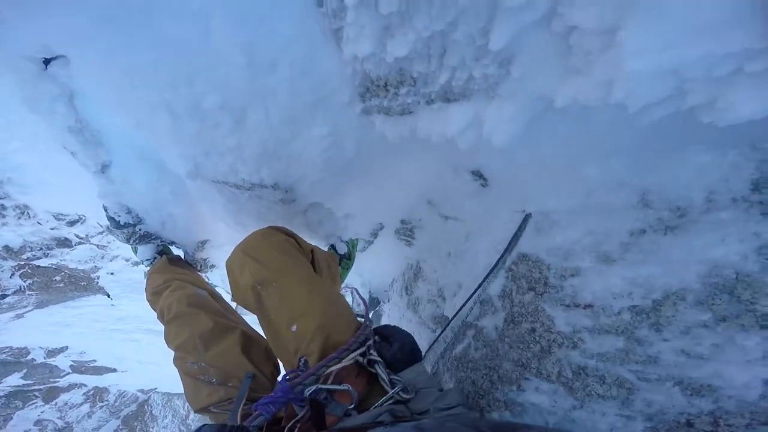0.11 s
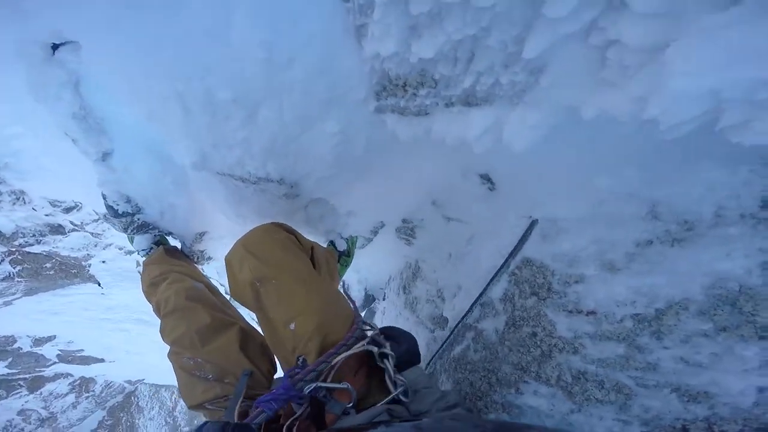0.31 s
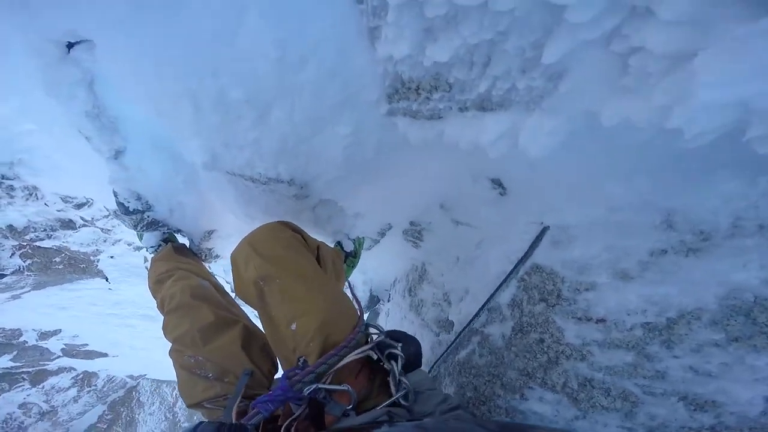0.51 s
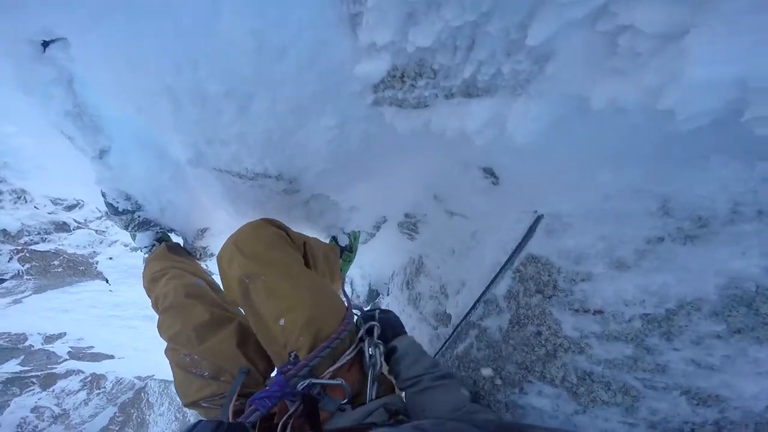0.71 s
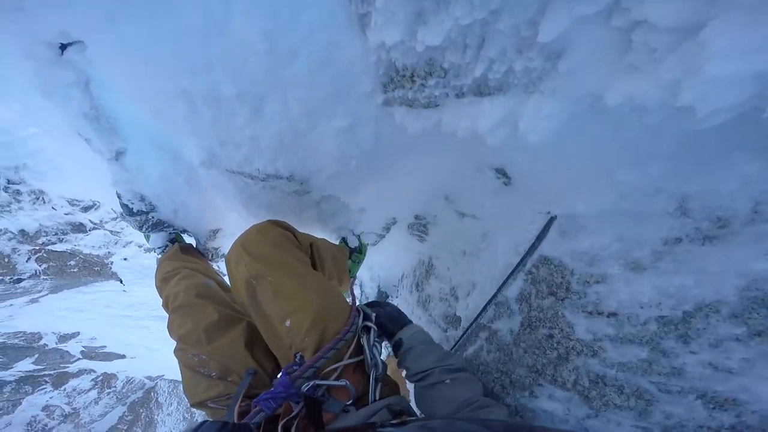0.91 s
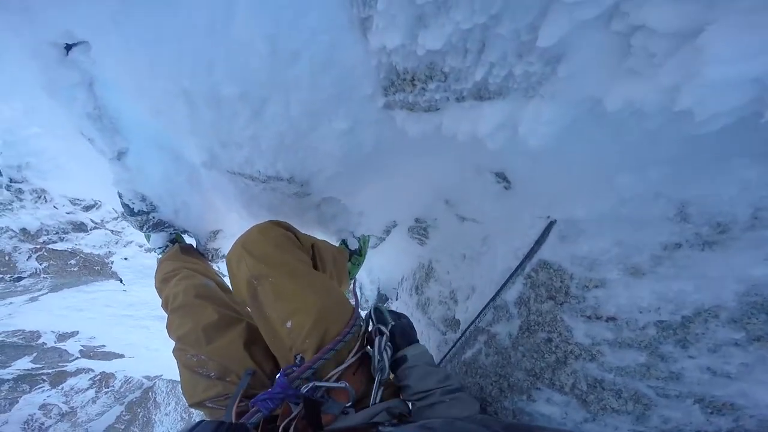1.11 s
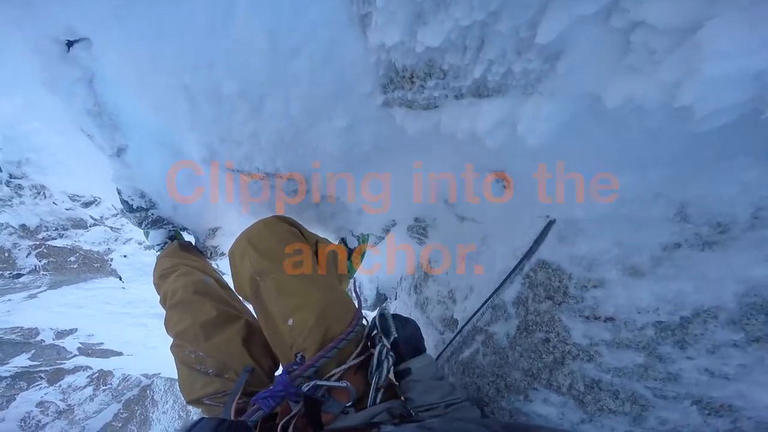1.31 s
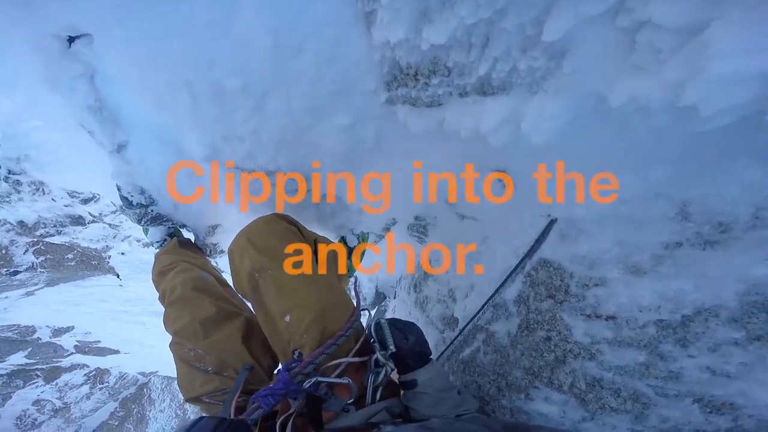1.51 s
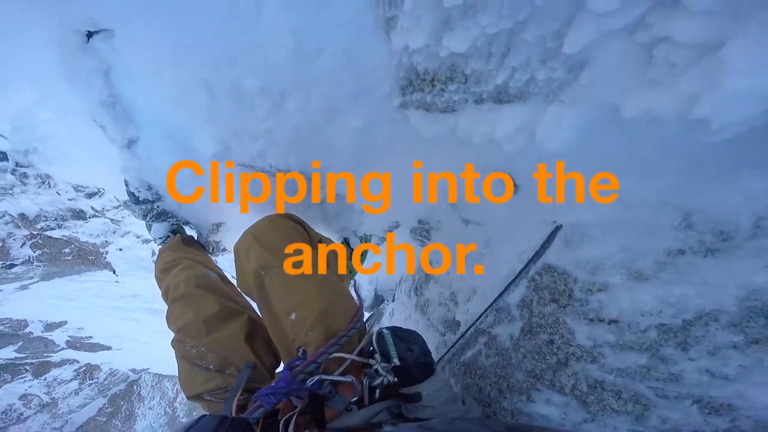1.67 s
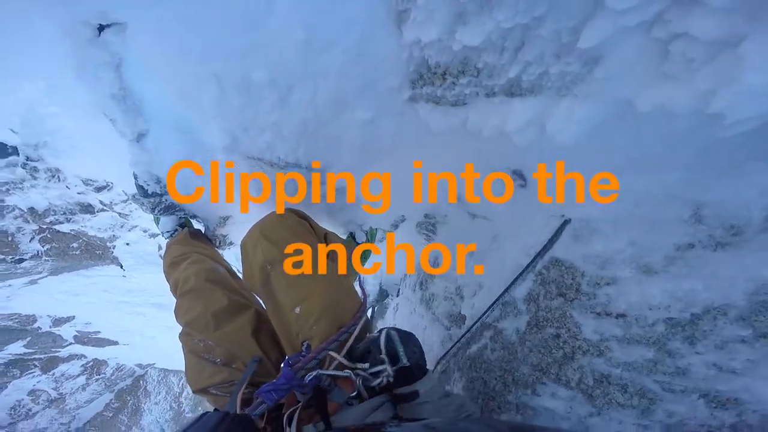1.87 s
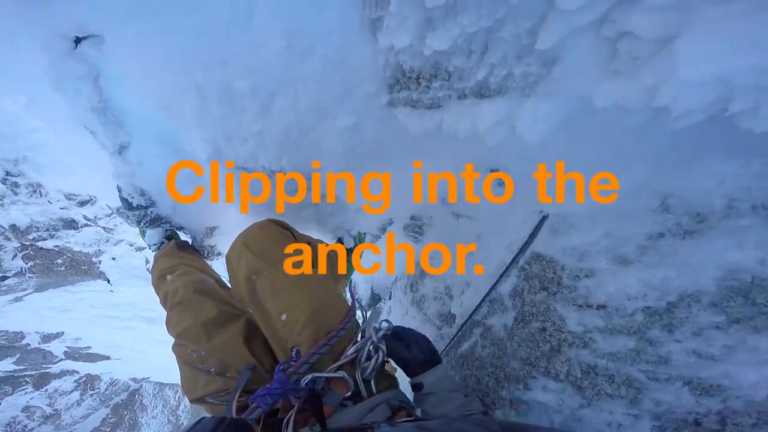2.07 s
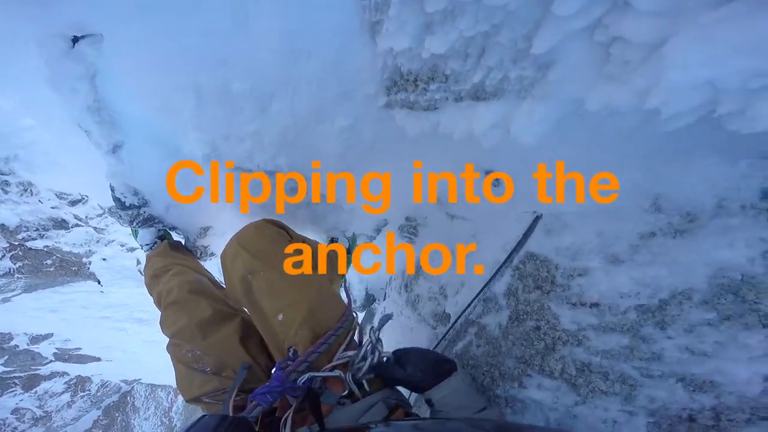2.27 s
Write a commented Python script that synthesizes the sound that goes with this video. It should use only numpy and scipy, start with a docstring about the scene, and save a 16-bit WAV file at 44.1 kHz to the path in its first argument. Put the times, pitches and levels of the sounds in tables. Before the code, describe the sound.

A boot knocks icy rock, then two hard sharp cracks and a thump, with faint snow scraping after

```python
"""First a soft hiss of sliding snow and cloth over a low rumble of air, then a boot knock and two sharp cracks.
A climber shifts stance on an icy rock wall, heard from a small camera worn on the body.
Boots, gear and camera mount ring as fading tones; knocks and ticks are short crunches split into bands.
The second crack thumps the mount and overloads the microphone. Later, ice and gear tick faintly.
Scraping, air and rubbing are shaped noise; the camera adds hiss and a thin whine."""
import sys
import numpy as np
from scipy import signal
from scipy.fft import rfft, irfft
from scipy.io import wavfile
from scipy.ndimage import uniform_filter1d

SR = 44100
rng = np.random.default_rng(int(sys.argv[2]) if len(sys.argv) > 2 else 0)


def int16_out(signal):
    """Quantize to a 16-bit WAV file."""
    q = np.round(np.clip(np.atleast_2d(signal).T, -1, 1) * 32767)
    wavfile.write(sys.argv[1], SR, q.astype(np.int16))


N = 105840  # samples, 2.4 s

# t60_s is always the time a sound takes to fade by 60 dB.
# Hollow body of a boot: pitch_hz, t60_s
BOOT_MODES = [(511, 0.044), (755, 0.047), (968, 0.034), (1260, 0.03), (1640, 0.023), (1950, 0.011),
              (2370, 0.019), (2760, 0.014), (3450, 0.012)]
# Boot against rock: start_s, then level_db of each boot mode, low to high
BOOT_KNOCKS = [ (0.0865, -24.5, -34.5, -19.5, -18.5, -14, -33, -24.5, -15, -23),
               (1.2564, -45, -38, -29.5, -28.5, -29, -28.5, -24, -23, -33),
               (1.9002, -50.5, -54, -42.5, -38.5, -44, -35.5, -46, -35, -50.5)]
BOOT_PUSH_S, BOOT_GRIT_DB, BOOT_GRIT_HZ = 0.0022, 0, 1020  # rise time, grit gain, grit upper limit

# Borders between the six pitch bands of a hard contact: edge_hz
BAND_EDGES_HZ = [330, 750, 1900, 3100, 5500, 8300, 13500]
# Hard knocks: start_s, contact_s, then level_db in each of the six bands, low to high
KNOCKS = [ (0.2201, 0.00042, -49, -27.5, -44, -43, -60, -66),
          (0.2222, 0.0024, -27, -18.5, -12, -18.5, -35.5, -37),
          (0.2578, 0.0028, -28.5, -10, -4.5, -22, -18.5, -29),
          (1.3290, 0.00071, -92, -57, -57.5, -70, -74, -69),
          (1.3853, 0.002, -76.5, -59, -50.5, -45.5, -63, -68),
          (1.4434, 0.0025, -71, -55, -48.5, -65, -70, -69),
          (1.9700, 0.00092, -67, -53.5, -42, -46.5, -44.5, -47),
          (1.9733, 0.0032, -67.5, -51.5, -42.5, -44, -40.5, -45.5)]
# Fading of a knock, one value per band: t60_s
KNOCK_T60_S = [0.017, 0.023, 0.016, 0.0023, 0.0028, 0.002]
# Small ticks of ice and gear: start_s, then level_db in each of the upper five bands
TICKS = [ (0.616, -73.5, -65.5, -69.5, -70, -78), (0.9614, -79, -64, -65, -78.5, -77.5),
         (1.1289, -71, -64, -64.5, -66, -61), (1.4706, -63, -61, -57, -60.5, -62),
         (1.5454, -67, -55.5, -63.5, -64.5, -88), (1.571, -60, -55.5, -60.5, -80.5, -88),
         (1.6830, -63, -58, -63.5, -68.5, -72), (1.746, -72.5, -61.5, -65, -59, -59),
         (1.9838, -60.5, -62, -65.5, -69.5, -61), (2.225, -64, -63, -62, -55, -64.5),
         (2.245, -67, -59, -52.5, -61, -60.5), (2.2945, -86.5, -73, -67, -62, -61),
         (2.3302, -66, -63, -52.5, -64, -68)]
# Fading of a tick, one value per upper band: t60_s
TICK_T60_S = [0.046, 0.015, 0.016, 0.01, 0.0042]
TICK_CONTACT_S = 0.00066
STRIKE_DB = 18  # the first instant of a contact, over the crunch that follows
# Resonances of the camera case, which colour knocks and ticks: pitch_hz, width_hz, level_db
CASE_MODES = [(520, 37, -2.5), (983, 180, 4.5), (1210, 95, 8.5), (1579, 340, 9), (2631, 120, 13),
              (3240, 1800, 8), (5616, 1200, 1), (6804, 200, 1.5), (10500, 890, 1)]

# Ring of the struck gear: pitch_hz, level_db, t60_s (before the extra damping of each blow)
GEAR_MODES = [(266, -8, .22), (897, -21, .11), (1923, -2.5, .175), (2266, -5, .08), (2993, -13, .08),
              (4560, 1, .04), (5830, -6, .033)]
# Blows that set the gear ringing: start_s, level_db, extra_damping_per_s (sign ignored),
# brightness_db_per_octave
GEAR_BLOWS = [(0.2242, -20.5, 123, 2.5), (0.2590, -26, -3, 0), (1.258, -58, 16, -1.5)]

# Thumps through the camera mount: start_s, pitch_hz, level_db, t60_s
THUMPS = [(0.0880, 122, -32.5, 0.026), (0.2592, 129, 4.5, 0.037), (1.324, 79.3, -38.5, 0.067),
          (1.687, 54.9, -41, 0.17), (2.128, 99.1, -42.5, 0.067)]
THUMP_RISE_S = 0.0045
MOUNT_HZ, MOUNT_DB, MOUNT_T60_S = 135, -13.5, 0.085  # the mount's own tone; level relative to the thump
# Rubbing carried through the mount, over time: time_s, level_db
RUB_LEVEL = [(0, -67), (.14, -63), (.22, -51.5), (.36, -54.5), (.52, -69), (.8, -77), (1.15, -71.5),
             (1.4, -64), (1.66, -74), (1.74, -56.5), (1.84, -51), (1.96, -55), (2.08, -64.5), (2.25, -53.5),
             (2.4, -64)]
# Tone of the rubbing: pitch_hz, level_db
RUB_COLOUR = [(30, -15.5), (70, -2.5), (130, 0), (165, -10), (225, -24), (360, -22.5), (480, -35.5),
              (900, -64.5)]

# Sliding strokes: peak_s, spread_s, pitch_hz, width_hz, level_db
SWISHES = [ (0.05, 0.22, 3520, 1020, -60), (0.02, 0.14, 7203, 2403, -65.5), (1.615, .012, 2413, 1213, -55),
           (1.849, 0.051, 2776, 280, -60.5), (2.22, .17, 2980, 894, -64), (2.22, 0.069, 5060, 1300, -65)]
# Scraping of snow and cloth, over time: time_s, level_db
SCRAPE_LEVEL = [(0, -58.5), (.2, -61.5), (.3, -67), (.46, -69), (.52, -85.5), (.58, -78.5), (.68, -70.5),
                (.75, -71), (.86, -65), (1.0, -71), (1.18, -63), (1.32, -63.5), (1.45, -58), (1.52, -65.5),
                (1.6, -60), (1.7, -64), (1.86, -59), (2.02, -57), (2.12, -59.5), (2.24, -56), (2.4, -63.5)]
# Tone of the scraping: pitch_hz, level_db
SCRAPE_COLOUR = [(250, -10.5), (650, -14), (1100, -14), (1550, -6.5), (2100, -10), (2900, -4), (3900, -12),
                 (5200, -12.5), (7500, -19.5), (9600, -23), (13000, -28.5), (15500, -34)]
GRAINS_PER_S, GRAIN_DB, FLICKER_DB = 130, -5.5, 1  # grain level is relative to the hiss

# Air moving over the microphone, over time: time_s, level_db
AIR_LEVEL = [(0, -50.5), (.25, -43), (.5, -47.5), (.85, -47.5), (1.2, -48.5), (1.42, -42.5), (1.52, -38.5),
             (1.66, -48.5), (1.82, -38), (2.0, -38), (2.2, -46), (2.4, -38.5)]
# Tone of the air: pitch_hz, level_db
AIR_COLOUR = [(8, 2), (25, -1), (38, -10), (55, -23), (100, -30), (200, -56), (400, -80.5)]

HISS_DB, WHINE_HZ, WHINE_DB = -88.5, 12618, -89
TOP_HZ = 15400  # upper limit of the camera's sound


def undb(db):
    """Turn decibels into gain."""
    return 10 ** (np.asarray(db) / 20)


def unit(x):
    """Scale a sound to an average strength (rms) of 1."""
    return x / np.sqrt(np.mean(x ** 2))


def curve(rows):
    """Join time and decibel points into a gain that changes over time."""
    times, levels_db = np.array(rows).T
    return undb(np.interp(np.arange(N) / SR, times, levels_db))


def colour(x, rows):
    """Shape a sound's tone by pitch and decibel points, then scale it to rms 1."""
    hz, db = np.array(rows).T
    bin_hz = np.maximum(np.fft.rfftfreq(N, 1 / SR), 1)
    gain = undb(np.interp(np.log(bin_hz), np.log(hz), db))
    return unit(irfft(rfft(x) * gain, N))


def walk(rate):
    """Wander smoothly at random, reaching about `rate` new values a second, with rms near 1."""
    step = int(SR / rate)
    held = np.repeat(rng.standard_normal(N // step + 1), step)
    return unit(uniform_filter1d(held, step)[:N])


def add(out, start_s, x):
    """Mix a short sound in at its start time."""
    i = int(start_s * SR)
    out[i:i + len(x)] += x[:N - i]


def fade(t, t60):
    """Die away steadily, by 60 dB in t60 seconds."""
    return np.exp(-np.log(1000) * t / t60)


def ring(t, hz, t60):
    """Sound one fading tone, as a struck object does at one of its natural pitches."""
    return np.sin(2 * np.pi * hz * t) * fade(t, t60)


def boots():
    """A boot meets the rock: a gritty push swells briefly and leaves the hollow boot ringing."""
    out, t = np.zeros(N), np.arange(SR // 10) / SR
    push = np.minimum(t / BOOT_PUSH_S, 1)
    grit_filter = signal.butter(4, BOOT_GRIT_HZ, fs=SR, output="sos")
    for start_s, *levels_db in BOOT_KNOCKS:
        body = np.zeros(len(t))
        for k, ((hz, t60), db) in enumerate(zip(BOOT_MODES, levels_db)):
            body += (-1) ** k * undb(db) * ring(t, hz, t60)  # neighbouring tones start in opposite directions
        grit = undb(BOOT_GRIT_DB) * signal.sosfilt(grit_filter, rng.standard_normal(len(t)))
        add(out, start_s, push * body * (1 + grit))
    return out


def case(x):
    """The camera case resonates at its own pitches and adds them to the contact."""
    out = x.copy()
    for hz, width, db in CASE_MODES:
        b, a = signal.iirpeak(hz, hz / width, SR)
        out += undb(db) * signal.lfilter(b, a, x)
    return out


def contact(contact_s, edges_hz, levels_db, t60s):
    """Hard surfaces strike and grind: each band's crunch holds, then fades at its own speed."""
    t = np.arange(SR // 10) / SR
    level_span = 0.012 * SR  # band levels are energy spread over 12 ms
    out = np.zeros(len(t))
    for lo, hi, db, t60 in zip(edges_hz, edges_hz[1:], levels_db, t60s):
        crunch = rng.choice([-1., 1.], len(t)) * fade(np.maximum(t - contact_s, 0), t60)
        crunch[0] += undb(STRIKE_DB)
        band_filter = signal.butter(5, [lo, hi], "band", fs=SR, output="sos")
        band = signal.sosfilt(band_filter, case(crunch))
        out += undb(db) * band * np.sqrt(level_span / np.sum(band ** 2))
    return out


def contacts():
    """Hard knocks and small ticks, both made of brief crunches."""
    out = np.zeros(N)
    for start_s, contact_s, *levels_db in KNOCKS:
        add(out, start_s, contact(contact_s, BAND_EDGES_HZ, levels_db, KNOCK_T60_S))
    for start_s, *levels_db in TICKS:
        add(out, start_s, contact(TICK_CONTACT_S, BAND_EDGES_HZ[1:], levels_db, TICK_T60_S))
    return out


def gear():
    """Metal gear rings on after a blow, in several fading tones at once."""
    out, t = np.zeros(N), np.arange(SR // 2) / SR
    pivot_hz = 2000  # brightness leaves this pitch unchanged
    for start_s, blow_db, damping, brightness in GEAR_BLOWS:
        tones = np.zeros(len(t))
        for hz, mode_db, t60 in GEAR_MODES:
            tilt_db = brightness * np.log2(hz / pivot_hz)
            tones += undb(mode_db + tilt_db) * ring(t, hz, t60)
        add(out, start_s, undb(blow_db) * tones * np.exp(-abs(damping) * t))
    return out


def mount():
    """The camera mount gives under a push and swings back; it also carries low rubbing."""
    out, t = np.zeros(N), np.arange(SR // 2) / SR
    rise = np.minimum(t / THUMP_RISE_S, 1)
    own_tone = undb(MOUNT_DB) * ring(t, MOUNT_HZ, MOUNT_T60_S)
    for start_s, hz, db, t60 in THUMPS:
        # The push starts to fade only once the rise is over.
        push = np.sin(2 * np.pi * hz * t) * fade(np.maximum(t - THUMP_RISE_S, 0), t60)
        add(out, start_s, -undb(db) * rise * (push + own_tone))  # minus: the first swing goes down
    rubbing = curve(RUB_LEVEL) * colour(rng.standard_normal(N), RUB_COLOUR)
    return out + rubbing


def swishes():
    """Each sliding stroke is noise through a resonance of its own, swelling and fading."""
    out, t = np.zeros(N), np.arange(N) / SR
    for peak_s, spread_s, hz, width, db in SWISHES:
        b, a = signal.iirpeak(hz, hz / width, SR)
        once = signal.lfilter(b, a, rng.standard_normal(N))
        rush = unit(signal.lfilter(b, a, once))  # filtered twice for a narrower tone
        swell = np.exp(-((t - peak_s) / spread_s) ** 2)
        out += undb(db) * swell * rush
    return out


def scrape():
    """Snow and cloth slide: a fine flickering hiss with grit ticking in it in clusters."""
    chance = GRAINS_PER_S / SR * walk(20) ** 2
    grains = (rng.random(N) < chance) * rng.standard_normal(N)
    sliding = rng.standard_normal(N) + undb(GRAIN_DB) * unit(grains)
    flicker = undb(FLICKER_DB * walk(68))
    return curve(SCRAPE_LEVEL) * flicker * colour(sliding, SCRAPE_COLOUR)


def air():
    """Moving air buffets the microphone: very low noise that swells and sinks."""
    return curve(AIR_LEVEL) * colour(rng.standard_normal(N), AIR_COLOUR)


def scene():
    """Add up every source at the microphone, as one channel."""
    mix = boots() + contacts() + gear() + mount() + swishes() + scrape() + air()
    return mix[None]


def record(dry):
    """The camera adds faint hiss and whine, clips the loudest peaks and cuts the top."""
    hiss = undb(HISS_DB) * rng.standard_normal(N)
    whine = undb(WHINE_DB) * np.sqrt(2) * np.sin(2 * np.pi * WHINE_HZ * np.arange(N) / SR)
    clipped = np.clip(dry + hiss + whine, -1, 1)
    top_cut = signal.ellip(8, 0.2, 70, TOP_HZ, fs=SR, output="sos")
    return signal.sosfilt(top_cut, clipped)


dry = scene()
out = record(dry)
int16_out(out)
```